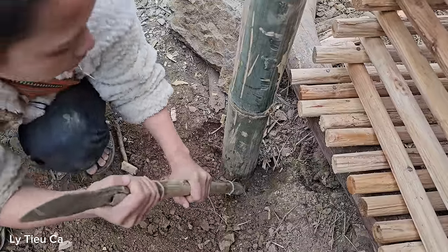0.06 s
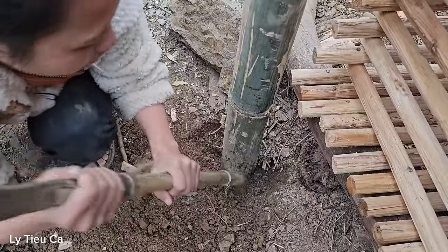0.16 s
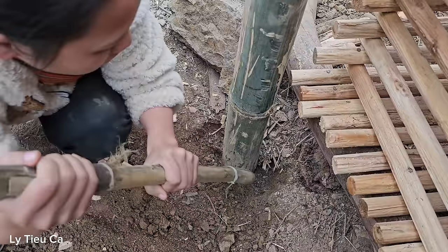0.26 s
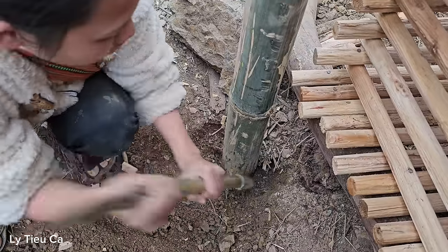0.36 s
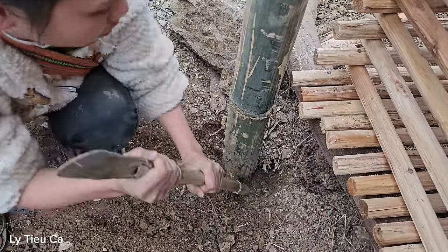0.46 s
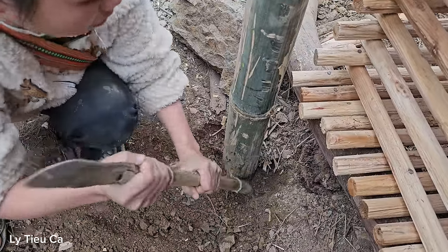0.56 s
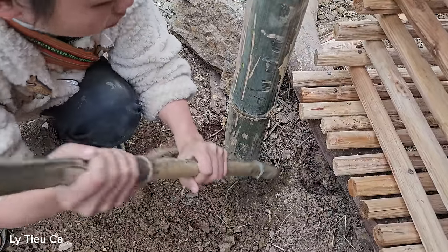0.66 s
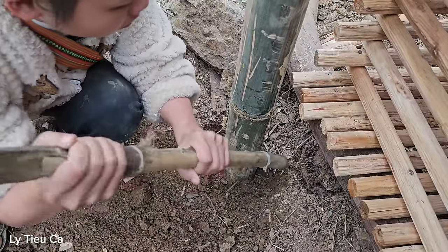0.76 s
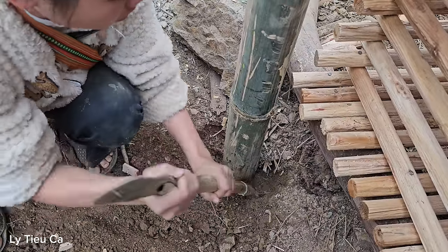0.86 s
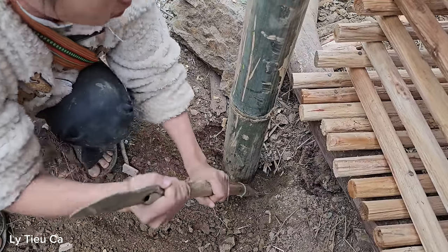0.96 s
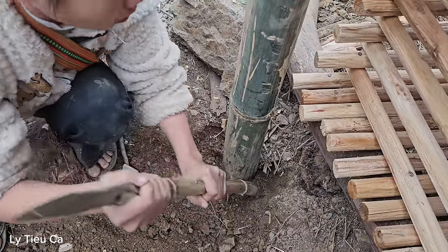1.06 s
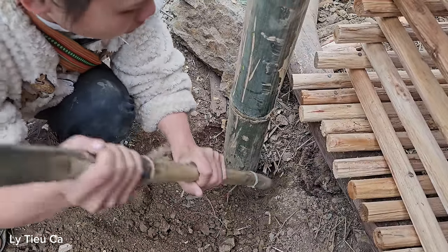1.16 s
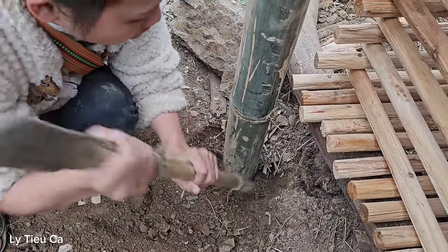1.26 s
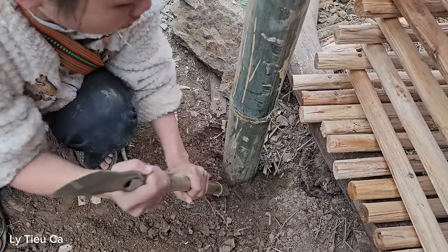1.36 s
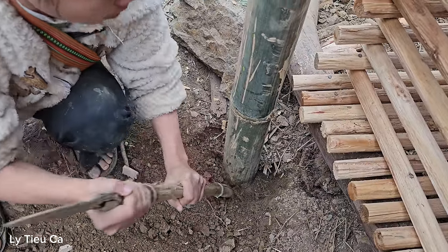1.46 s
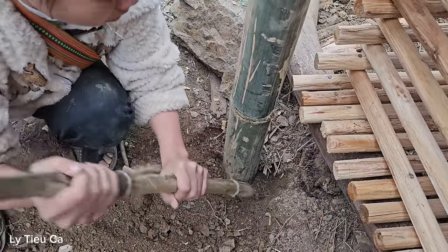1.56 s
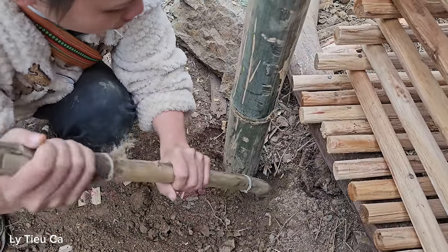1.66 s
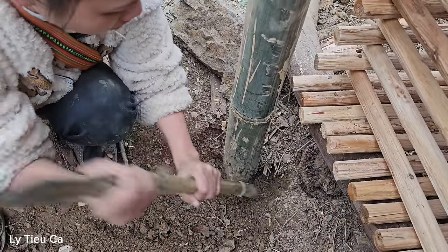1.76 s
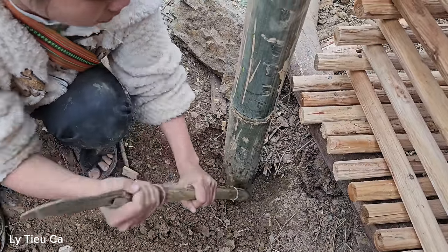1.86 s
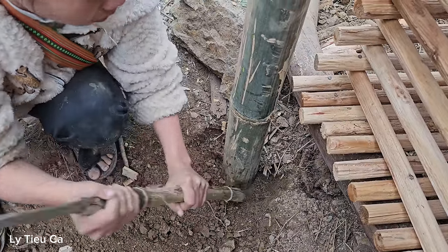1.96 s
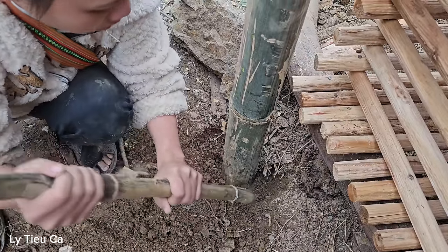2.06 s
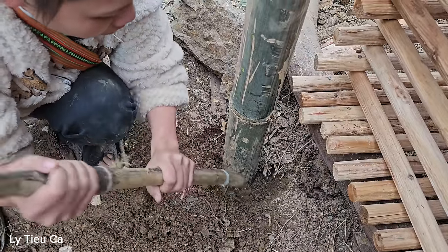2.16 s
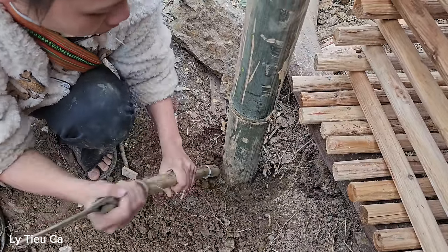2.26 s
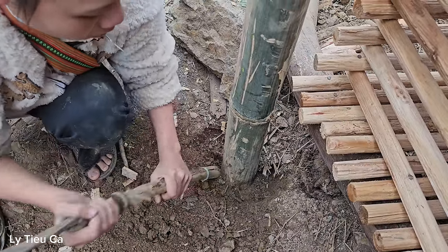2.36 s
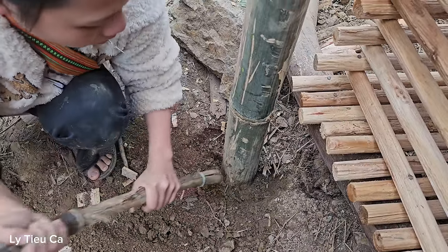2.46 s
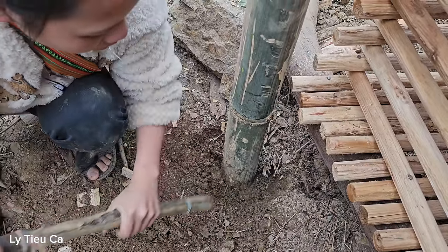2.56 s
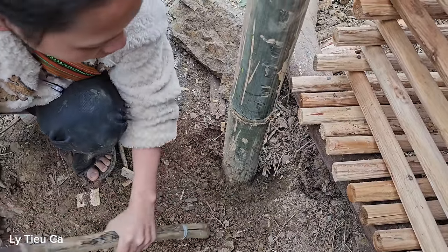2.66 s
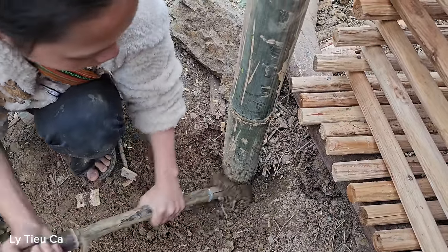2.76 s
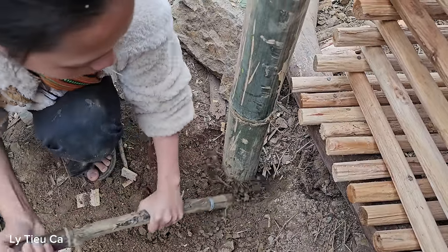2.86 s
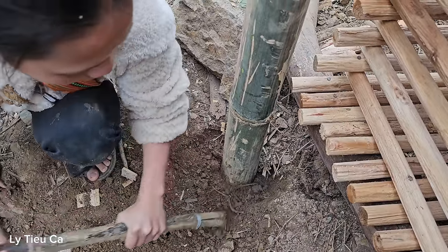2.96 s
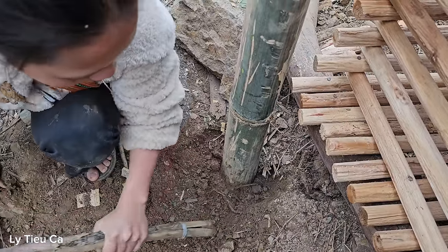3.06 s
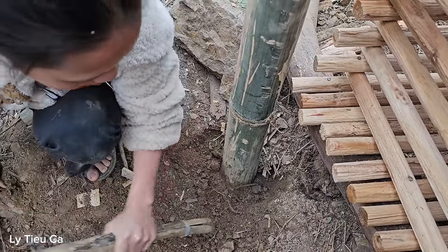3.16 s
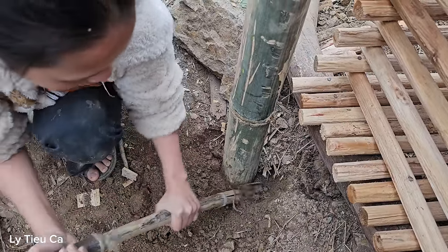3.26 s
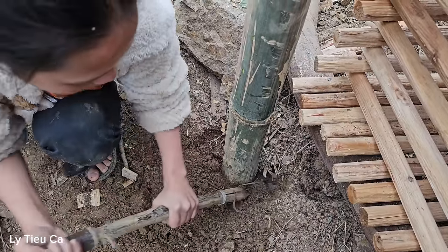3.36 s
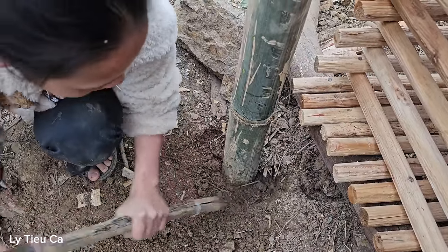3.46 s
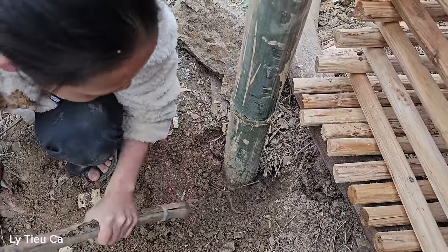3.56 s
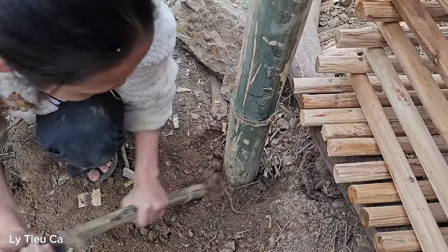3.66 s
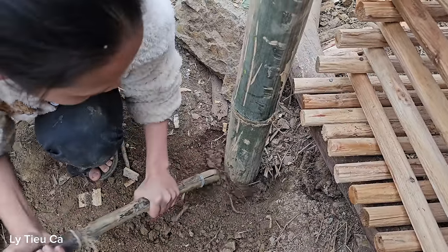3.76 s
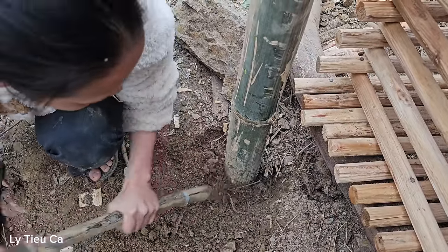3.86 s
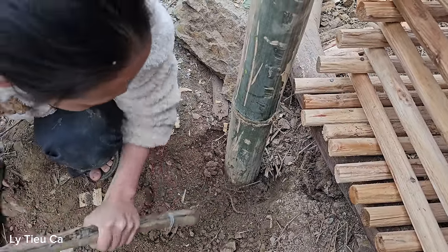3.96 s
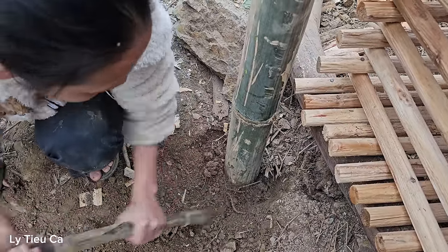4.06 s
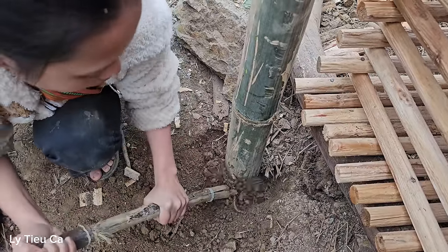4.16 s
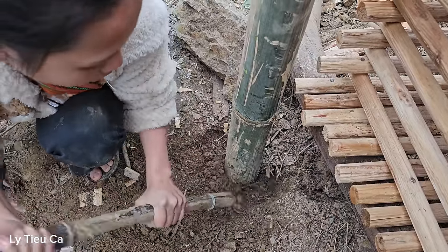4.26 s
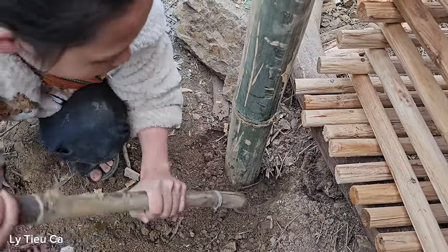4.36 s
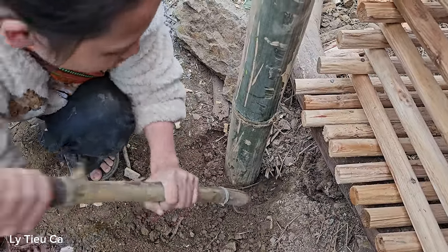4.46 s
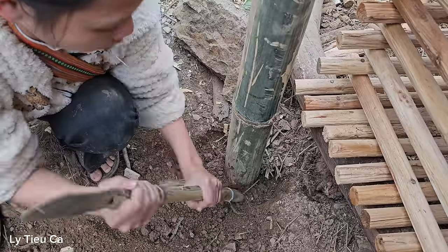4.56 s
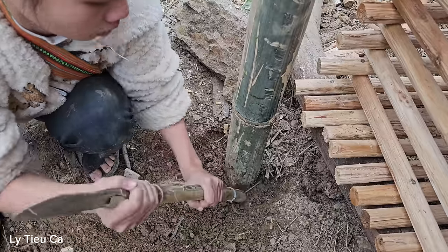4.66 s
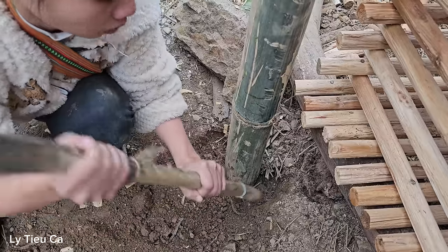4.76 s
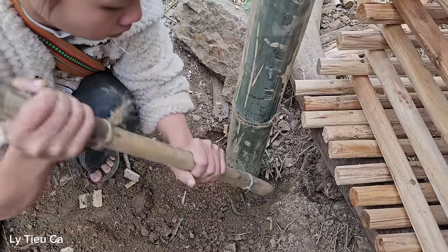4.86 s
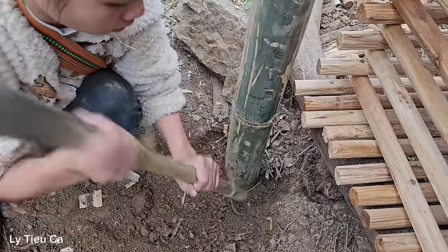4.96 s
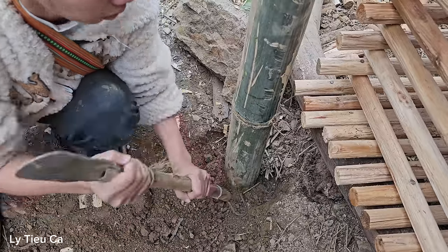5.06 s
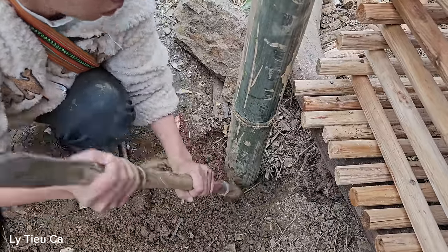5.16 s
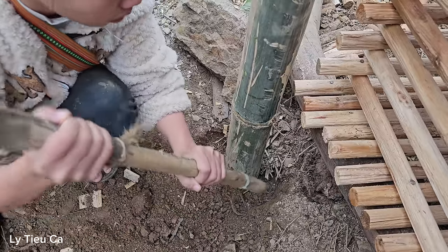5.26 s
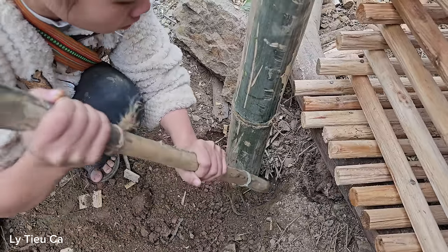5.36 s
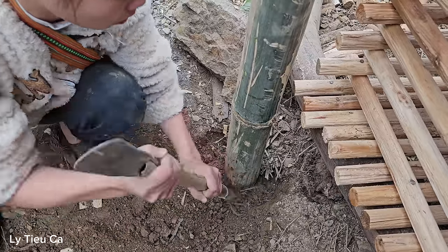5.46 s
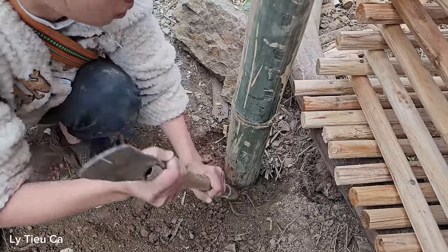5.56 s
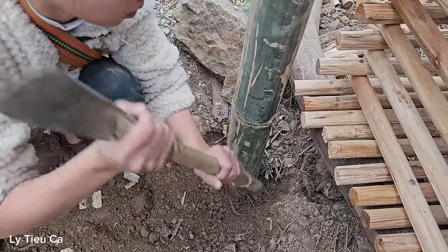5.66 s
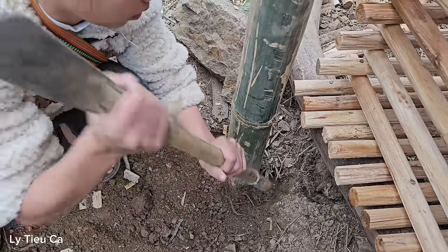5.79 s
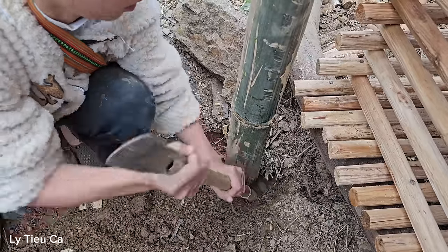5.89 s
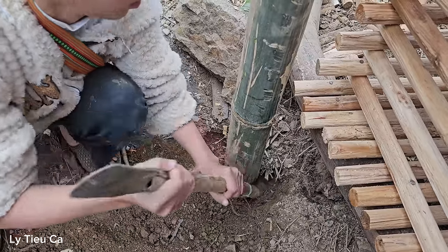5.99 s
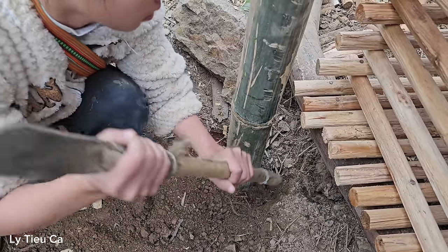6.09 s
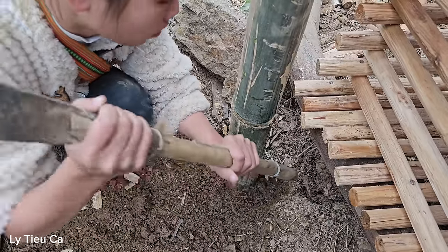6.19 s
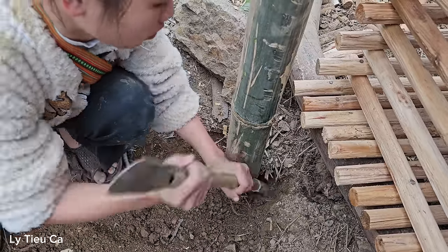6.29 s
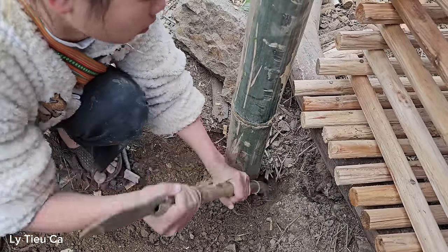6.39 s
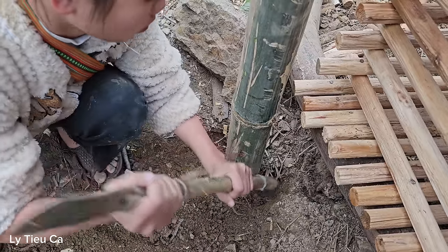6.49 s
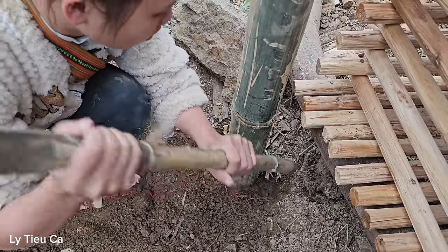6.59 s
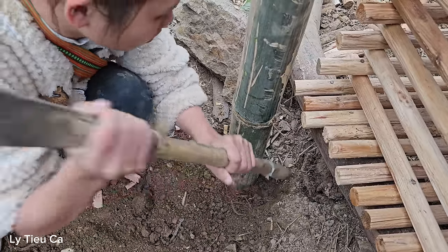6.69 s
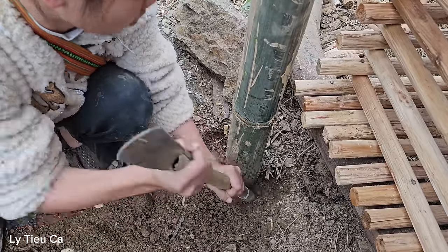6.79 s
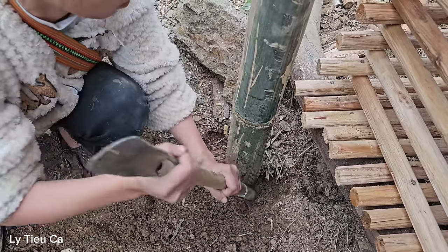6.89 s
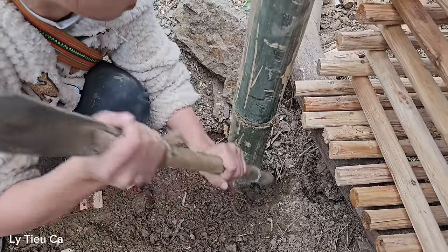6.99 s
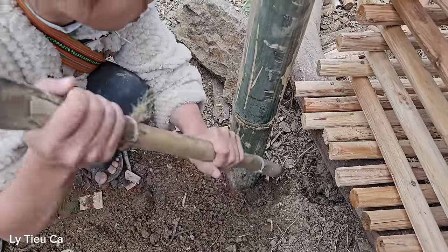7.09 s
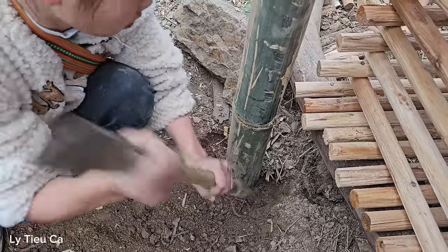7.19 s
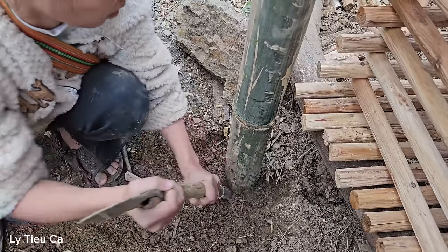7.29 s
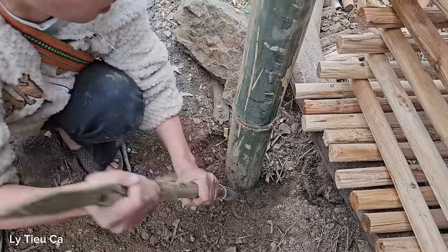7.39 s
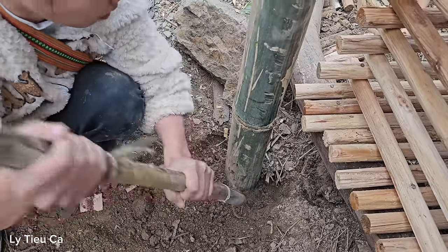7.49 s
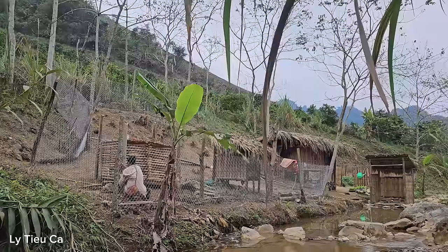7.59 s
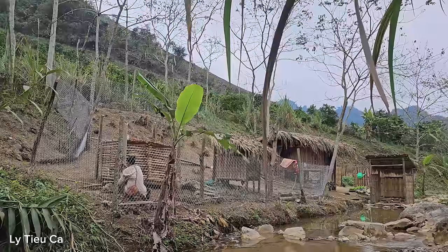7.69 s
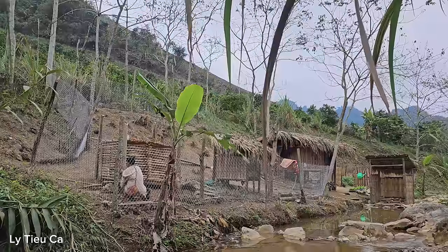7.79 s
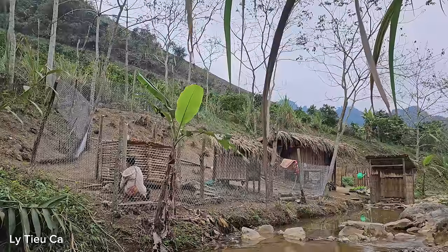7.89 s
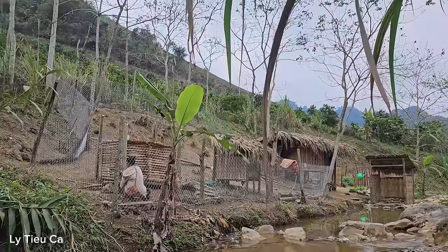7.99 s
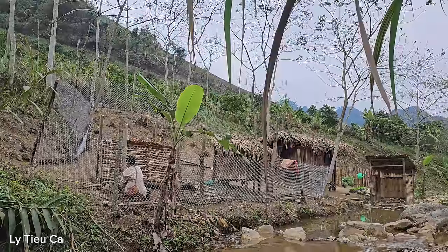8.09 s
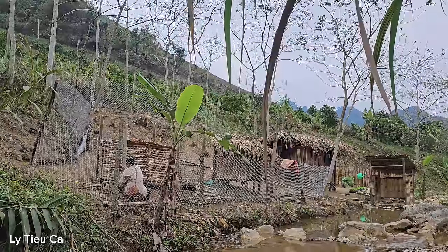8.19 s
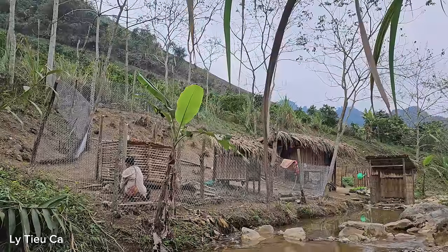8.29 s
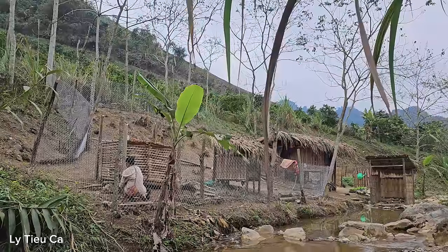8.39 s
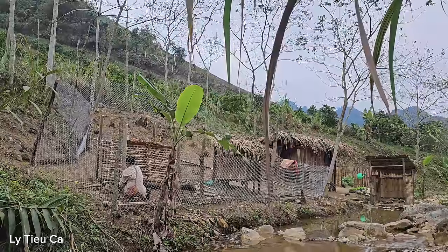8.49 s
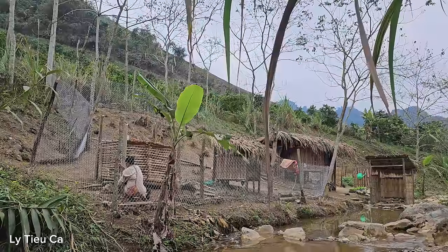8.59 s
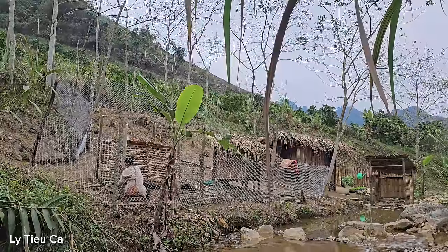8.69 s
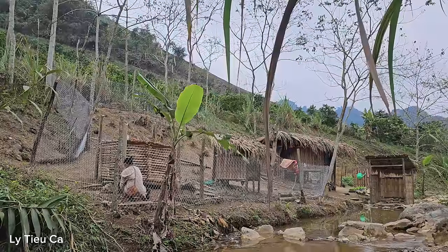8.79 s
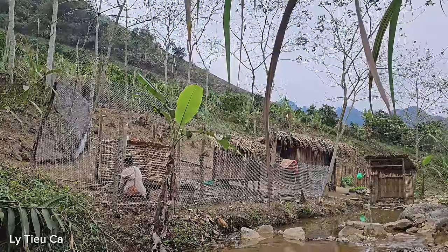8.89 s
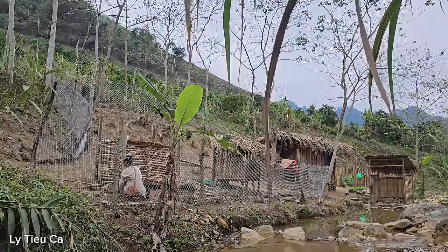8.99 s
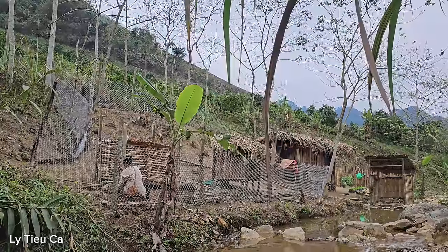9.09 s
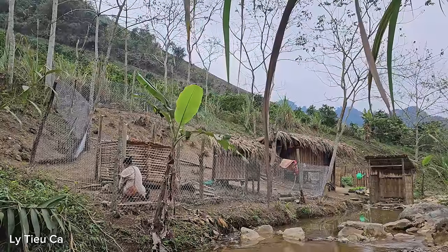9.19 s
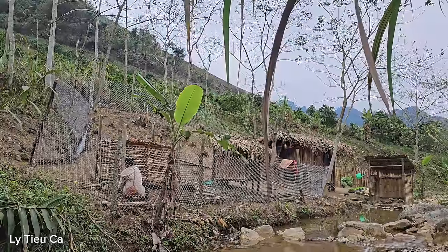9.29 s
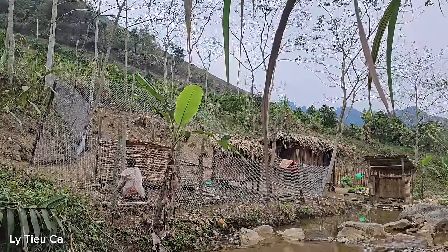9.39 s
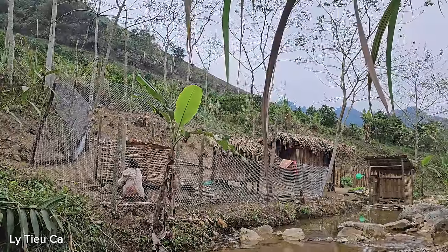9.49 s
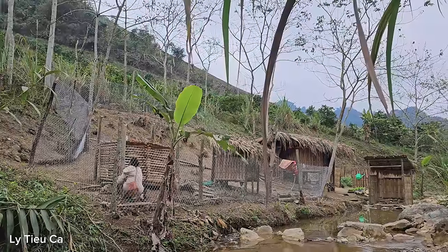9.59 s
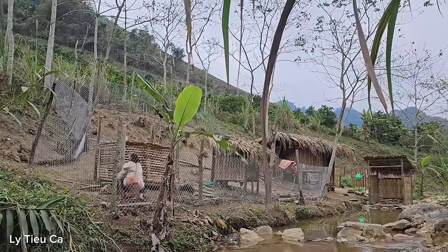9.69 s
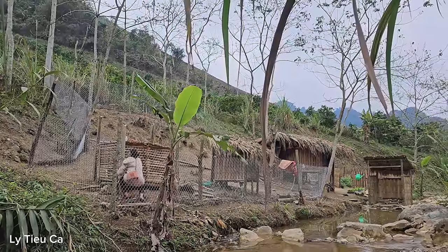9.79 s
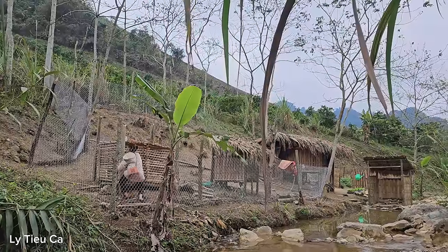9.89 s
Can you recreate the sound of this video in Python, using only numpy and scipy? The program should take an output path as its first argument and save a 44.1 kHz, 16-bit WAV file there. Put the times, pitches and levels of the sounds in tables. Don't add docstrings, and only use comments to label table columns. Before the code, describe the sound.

Sharp woody knocks, dull earth thuds and crunching grit repeat about twice a second among peeping chicks, then turn faint in a distant view.

```python
import sys
import numpy as np
from scipy import signal
from scipy.fft import rfft, irfft
from scipy.io import wavfile
from scipy.ndimage import uniform_filter1d

SR = 44100
rng = np.random.default_rng(int(sys.argv[2]) if len(sys.argv) > 2 else 0)


def ratio_of_db(decibels):
    return 10 ** (np.asarray(decibels, float) / 20)


def digitize_waveform(pressure):
    field = np.atleast_2d(pressure).T
    bounded = np.clip(field, -1, 1)
    quanta = np.round(bounded * 32767).astype(np.int16)
    wavfile.write(sys.argv[1], SR, quanta)


N = 438349
MOVE_S = 7.55
LEAD = 286
RIGHT_LAG_S = 21 / SR


def evened(x):
    return x / np.sqrt(np.mean(x ** 2) + 1e-20)


def read(points, hz):
    f, value = np.transpose(points)
    return np.interp(np.log(hz + 1), np.log(f + 1), value)


def coloured(x, points):
    hz = np.fft.rfftfreq(x.shape[-1], 1 / SR)
    return evened(irfft(rfft(x) * ratio_of_db(read(points, hz)), x.shape[-1]))


def ring(modes, seconds, detune=0.):
    t = np.arange(round(seconds * SR)) / SR
    return sum(ratio_of_db(db - 60 * t / t60) * np.sin(2 * np.pi * hz * (1 + detune * rng.standard_normal()) * t)
               for hz, db, t60 in modes)


def onset(sound, rise_s):
    return 1 - np.exp(-np.arange(len(sound)) / SR / rise_s)


def add(mix, s, sound):
    part = mix[:, round(s * SR):][:, :sound.shape[-1]]
    part += sound[..., :part.shape[1]]


def placed(events, source):
    out = np.zeros((2, N))
    for s, *settings in events:
        add(out, s, source(*settings))
    return out


def knock(db, crack_db, long_db, hollow_db, upper_db):
    # pitch_hz, level_db, t60_s
    handle = [(704.6, 0.5, 0.043), (790.9, -12.5, 0.04), (579, -8, 0.055), (755, 4.5, 0.007)]
    # pitch_hz, level_db, t60_s
    upper = [(1150, -9.5, 0.017)]
    # pitch_hz, level_db, t60_s
    side_ring = [(982, -7, 0.019), (1390, -19, 0.022)]
    # pitch_hz, level_db, t60_s
    fibres = [(1530, 21, 0.0057), (1790, 15, 0.011), (2215, 19, 0.015), (2770, 17.5, 0.012),
              (3123, 18, 0.0084), (3850, 16.5, 0.00904), (4500, 11.5, 0.0089), (5150, -16, 0.0038)]

    body = ring(handle, .2, detune=0.006)
    body += ratio_of_db(upper_db) * (ring(upper, .2, detune=0.01) - ring(side_ring, .2, detune=0.015))
    t = np.arange(len(body)) / SR
    grip_s = .055 + .01 * rng.random()
    body += ring([(506, long_db + 14.0, 0.086)], .2, detune=0.007) * np.exp(-(t / grip_s) ** 4)
    body += ring([(281, hollow_db + 15.5, 0.085)], .2, detune=0.012)
    body = signal.lfilter(*signal.butter(2, 690, "high", fs=SR), body)
    body *= onset(body, .00015)
    crack = ring(fibres, .2, detune=0.012)
    crack *= onset(crack, .00018)
    blow = body + ratio_of_db(crack_db - 19.0) * crack
    graze = ratio_of_db(-38) * body[:LEAD] * np.hanning(LEAD) ** .5 * np.exp(np.arange(LEAD) / 150)
    return -ratio_of_db(db) * (np.pad(blow, (LEAD, 0)) + np.pad(graze, (0, len(body))))


def post_knocks():
    # start_s, peak_db, crack_db, upper_db, hollow_db
    square = [(0.3511, -4, -11, 8, -11), (0.827, -4.5, -15, 4.5, -14), (1.761, -4, -10, 6.5, -15.5),
              (4.525, -23.5, 3.5, 10, -10), (4.53, -27.5, -3, 13, -14.5), (5.8261, -4.5, -5.5, 2, -18),
              (5.835, -37, -31, 2, -7), (6.2738, -12.5, -14.5, 2.5, -11), (6.7374, -5.5, -6.5, 6, -22),
              (7.1961, -13, -12.5, 5, -17), (7.2025, -15.5, -21, 3, -16)]
    # start_s, peak_db, crack_db, hollow_db, upper_db
    glancing = [
        (1.291, -46, -30, 20, -10),
        (2.1805, -19.5, -17, 1, -18),
        (2.7455, -27.5, -2, -1, -2),
        (3.2455, -32.5, -20, -7, 10),
        (3.672, -49.5, 23, 8, -1),
        (4.038, -58, 12, 6.5, 1),
        (4.969, -28.5, -6.5, -9, 2),
        (5.423, -34.5, -19, -21, -9),
        (8.769, -62, 2, -13, -3),
        (9.188, -53, -2, -3, 1),
    ]
    out = np.zeros((2, N))
    for s, db, crack_db, upper_db, hollow_db in square:
        add(out, s - LEAD / SR, knock(db, crack_db, -17.5, hollow_db, upper_db))
    for s, db, crack_db, hollow_db, upper_db in glancing:
        add(out, s - LEAD / SR, knock(db, crack_db, -8, hollow_db, upper_db))
    return out


def thud(db, slap_db, deep_db, post_db):
    # pitch_hz, level_db, t60_s
    ground = [(75.8, 1.3, 0.11), (92.5, 2.5, 0.047)]
    # pitch_hz, level_db, t60_s
    slap = [(200, 2.8, 0.042), (238, 8, 0.038)]
    # pitch_hz, level_db, t60_s
    deep = [(37.2, -5.5, 0.44)]
    # pitch_hz, level_db, t60_s
    post = [(108.5, -9, 0.22)]

    swing = ring(ground, .5, detune=0.017)
    swing += ratio_of_db(slap_db) * ring(slap, .5, detune=0.038)
    swing += ratio_of_db(deep_db) * ring(deep, .5)
    swing += ratio_of_db(post_db) * ring(post, .5, detune=0.036)
    swing *= onset(swing, 0.0041)
    swing = np.convolve(swing, np.hanning(round(0.0029 * SR)))
    return ratio_of_db(db + 4.0) * swing / abs(swing).max() * ratio_of_db([[.6], [-.6]])


def ground_thuds():
    # start_s, peak_db, slap_db, deep_db, post_db
    thuds = [(0.359, -16.5, 1.5, -7.5, 4.5), (0.834, -16.5, 2, -8, 2.5), (1.285, -20.5, -10, -5, 0.5),
             (1.769, -18.5, -6, -9, 6), (2.22, -23, -7.5, -9, 0), (2.752, -33.5, -2, -7, 20),
             (3.235, -48, 0, -10, 19), (3.619, -40, 1, 9.5, 10), (4.0415, -29, -2.5, -11, 3.5),
             (4.529, -24.5, -2.5, 0, -4), (4.97, -23, -5.5, -2.5, 4.5), (5.422, -18.5, -1, -3, 1),
             (5.836, -23, -4, -1.5, -4), (6.271, -28.5, -3, -1, 5), (6.743, -18.5, -1.5, -5.5, 1.5),
             (7.2015, -15.5, 4, -5.5, 2), (7.809, -42.5, -1, 1.5, 2), (8.291, -39, -1, -7.5, 3),
             (8.768, -36.5, -0.5, -6, -1), (9.19, -37.5, 3, -7, 2)]
    return placed(thuds, thud)


def crunch(db, low_db, seconds):
    # pitch_hz, level_db
    grit_low = [(300, -41), (900, -11.5), (2000, -15), (3200, -12.5), (4500, -9), (5800, -27.5),
                (8000, -80)]
    # pitch_hz, level_db
    grit_high = [(3000, -16), (5500, -9), (7500, -1.5), (9500, -10), (11500, -2), (13000, -9), (15800, -16),
                 (16800, -49.5)]
    # pitch_hz, level_db
    lumps = [(150, -51.5), (400, 7), (900, 1), (1500, -37.5), (2500, -57.5)]

    t = np.arange(8192) / SR
    seconds = np.clip(seconds, .003, .06)
    sink = np.clip(t / 0.0072, 0, 1) ** 2
    shape = sink * (np.exp(-(t / seconds) ** 2.57) + 0.1 * np.exp(-t / 0.03))
    grains = rng.standard_normal((3, len(t))) * ratio_of_db(1.3 * rng.exponential(1, len(t)))
    clumps = evened(uniform_filter1d(rng.standard_normal(len(t)), size=150))
    shape *= ratio_of_db(1.87 * clumps)
    grains = grains[:2] + .5 * grains[2]
    low = ratio_of_db(low_db - 1.0) * coloured(grains, grit_low) * ratio_of_db([[-1.2], [1.2]])
    high = coloured(grains, grit_high) * ratio_of_db([[-1.8], [1.8]])
    clod_db = -4.5 - .5 * (db + 39)
    clods = ratio_of_db(clod_db) * coloured(grains.sum(0), lumps)
    return ratio_of_db(db - 9.0) * shape * (low + high + clods)


def grit_crunches():
    # start_s, peak_db, low_db, length_s
    crunches = [(0.349, -32, 6, 0.021), (.47, -55, -12, 0.075), (0.825, -24.5, 7.5, 0.011),
                (1.2713, -34, 3, 0.028), (1.31, -45.5, 0, 0.026), (1.759, -30.5, 6, 0.015),
                (2.176, -29, 5.5, 0.011), (2.21, -38, 3.5, 0.031), (2.722, -38.5, 8, 0.046),
                (2.772, -28.5, 8, 0.012), (2.885, -47, -4, 0.018), (3.189, -47, 5.5, 0.066),
                (3.23, -36, 9, 0.034), (3.279, -40, 5.5, 0.018), (3.61, -36, -4, 0.021),
                (3.661, -38, 8.5, 0.036), (4.03, -43.5, 1, 0.0396), (4.091, -46.5, 8.5, 0.039),
                (4.5218, -20.5, 10, 0.0102), (4.962, -26, 2, 0.011), (5.416, -29.5, 3, 0.011),
                (5.826, -25.5, 6.5, 0.016), (5.857, -47, 10.5, 0.018), (5.931, -49, 8, 0.025),
                (6.258, -35.5, 10, 0.024), (6.309, -36, 4, 0.0083), (6.59, -52, 7, 0.016),
                (6.734, -24.5, 10.5, 0.0154), (7.196, -21.5, 2.5, 0.011), (8.283, -53, 11, 0.016),
                (8.756, -57.5, 9, 0.0413)]
    return placed(crunches, crunch)


def tick(db, hz, t60):
    return ring([(hz, db + 2.0, t60), (hz * 1.2, db - 9.5, t60), (hz * 0.77, db - 5.5, t60)], .03, detune=0.025)


def pebble_snaps():
    # start_s, peak_db, pitch_hz, t60_s
    ticks = [(1.301, -39.5, 3440, 0.0084), (1.318, -52.5, 13350, 0.035), (1.8, -54, 13350, .03),
             (1.326, -40, 3000, 0.0067), (2.216, -32, 4600, .01), (2.7346, -28, 3000, .006),
             (2.7424, -29, 3180, 0.0093), (2.7736, -20.5, 4300, 0.00495), (2.7788, -26.5, 2967, 0.016),
             (2.8724, -40, 4500, 0.0053), (2.8947, -39, 4800, .006), (3.192, -44, 4500, 0.007),
             (3.2863, -41.5, 3800, 0.0073), (3.328, -44, 3900, 0.0088), (4.0371, -44, 2980, 0.0057),
             (4.5265, -18.5, 900, 0.02), (4.53, -27, 925, 0.019), (5.285, -42.5, 5150, 0.0075),
             (5.8365, -26, 3950, .012), (5.864, -40, 4800, 0.0084), (6.264, -36, 7260, 0.028),
             (6.2735, -24.5, 4320, 0.018), (6.586, -43, 13500, 0.0065), (6.745, -27, 4115, 0.01),
             (8.291, -59, 3000, .008), (8.772, -41, 3500, 0.0091), (8.875, -47, 3700, .008),
             (9.11, -41, 3630, 0.0085)]
    return placed(ticks, tick)


def ports(x):
    # pitch_hz, left_lead_rad
    port_turn = [(800, -.1), (1000, -.45), (1150, 1.4), (1600, 1.3), (2100, -1), (2700, -.4), (3900, -.2),
                 (5500, 1)]
    # pitch_hz, left_minus_right_db
    port_lean = [(500, 1.4), (1000, 0.5), (1600, 6.5), (2700, 11.5), (3600, 1), (4600, -17), (6000, -5),
                 (9000, -7.5)]

    hz = np.fft.rfftfreq(N, 1 / SR)
    half = ratio_of_db(read(port_lean, hz) / 2) * np.exp(.5j * read(port_turn, hz))
    return irfft(rfft(x) * np.array([half, 1 / half]), N)


def peep(db, first_hz, last_hz, seconds, held):
    # pitch_hz, level_db
    beak = [(2300, -10), (3350, 6), (3980, 0), (4300, 0), (4680, -5), (5150, -2), (6600, 3), (7700, -8)]
    # pitch_hz, left_minus_right_db
    chick_lean = [(2500, 15), (3500, 12), (4500, -13), (5200, -14.5)]

    u = np.linspace(0, 1, round(seconds * SR))
    fall = np.hypot(u - held, .09) + u - held
    fall = (fall - fall[0]) / (fall[-1] - fall[0])
    beat = 2 * np.pi * (rng.uniform(18, 40) * u * seconds + rng.random())
    hz = first_hz + (last_hz - first_hz) * fall + 45 * np.cos(beat)
    hz += 2000 * seconds * np.maximum(held - u, 0) / 2
    turn = 2 * np.pi * np.cumsum(hz) / SR
    octave_db = -9 + .8 * (db + 50)
    tone = ratio_of_db(read(beak, hz)) * np.sin(turn)
    tone += ratio_of_db(read(beak, 2 * hz) + octave_db) * np.sin(2 * turn)

    hang_db = -4 * np.clip((held + .1 - u) / .2, 0, 1) * (held > 0)
    blur_db = 1.51 * evened(uniform_filter1d(rng.standard_normal(len(u)), size=400))
    flutter_db = 2.5 * np.sin(beat)
    tone *= ratio_of_db(db + 3.0 + flutter_db + hang_db + blur_db) * signal.windows.tukey(len(u), .3)
    lean, lag = read(chick_lean, hz) / 2, round(RIGHT_LAG_S * SR)
    return np.array([np.pad(tone * ratio_of_db(lean), (0, lag)), np.pad(tone * ratio_of_db(-lean), (lag, 0))])


def chicks():
    # start_s, level_db, top_hz, hold_s, fall_s
    small_peeps = [(1.1, -57, 5230, 0.022, 0.046), (1.415, -55.5, 4470, 0.028, 0.063),
                   (1.566, -51.5, 4150, 0.0483, 0.016), (2.022, -49, 4500, 0.032, 0.037),
                   (2.639, -51.5, 4374, 0.0246, 0.029), (3.025, -58.5, 4020, 0.009, 0.021),
                   (4.13, -51, 4600, 0.014, 0.046), (5.56, -56, 4200, 0.062, 0.023),
                   (5.639, -62, 4337, 0.0117, 0.072), (5.853, -59, 4390, 0.013, 0.065),
                   (6.51, -57.5, 4580, 0.058, 0.068), (6.872, -52, 2460, 0.031, 0.012),
                   (8.474, -60.5, 4190, 0.1037, 0.04), (9.786, -64, 4363, 0.061, 0.052)]
    # start_s, level_db, last_hz, hold_s, fall_s
    big_peeps = [
        (0.21, -59.5, 3600, 0.09, 0.076),
        (6.429, -58.5, 4600, 0.039, 0.081),
        (5.972, -53.5, 1950, 0.091, 0.094),
    ]
    # start_s, level_db, hold_s, fall_s
    far_peeps = [
        (7.865, -63, 0.012, 0.05),
        (7.964, -67, 0.051, .07),
        (8.047, -66.5, 0.035, 0.047),
        (8.785, -59, 0.057, 0.08),
    ]
    # start_s, level_db, first_hz, last_hz, length_s
    scraps = [(0.061, -59, 4750, 4070, 0.078), (.4, -59, 4340, 4300, .025),
              (0.464, -54.5, 3850, 2760, 0.0587), (0.541, -59, 4550, 3700, 0.041),
              (0.655, -51.5, 4056, 2910, 0.041), (0.741, -59.5, 5280, 5160, 0.039),
              (0.771, -53.5, 5090, 4970, 0.068), (0.865, -47.5, 4270, 2870, 0.062),
              (0.954, -59, 4600, 4300, 0.062), (.96, -61, 4100, 4300, 0.069),
              (1.053, -58.5, 4880, 5250, 0.054), (1.5, -62, 4820, 4300, 0.052),
              (1.972, -63, 4750, 4550, 0.047), (2.018, -60, 3450, 2950, .024),
              (2.146, -55.5, 4443, 4300, 0.02), (2.195, -57, 3720, 3230, 0.026),
              (2.676, -58, 4480, 4200, 0.054), (2.896, -55, 4250, 4050, 0.061),
              (2.953, -57.5, 3260, 2850, 0.029), (3.097, -55, 4150, 3820, 0.052),
              (3.383, -59, 4300, 3580, 0.042), (3.429, -55.5, 3400, 2800, 0.043),
              (3.587, -55, 4500, 4340, 0.056), (3.637, -54, 3465, 3080, 0.0297),
              (3.762, -58, 4130, 2980, 0.04), (4.469, -56, 5240, 5280, 0.07),
              (4.611, -47.5, 4580, 2330, 0.0695), (4.842, -58.5, 4460, 4230, 0.072),
              (5.015, -58.5, 5440, 4950, 0.13), (5.012, -55.5, 5050, 4800, 0.107),
              (5.056, -57.5, 4350, 4200, 0.027), (5.102, -59.5, 3670, 2800, 0.032),
              (5.148, -53, 4300, 2310, 0.075), (6.785, -60, 3170, 2600, 0.032),
              (6.86, -59, 4950, 5110, .085), (6.949, -51, 4450, 2450, 0.064),
              (7.303, -63, 5030, 4620, 0.135), (7.417, -63.5, 3920, 3330, 0.033),
              (7.432, -54, 4370, 2230, 0.073)]
    # start_s, level_db, first_hz, last_hz, length_s
    far_scraps = [(7.626, -62, 4380, 3700, .05), (7.675, -58.5, 4300, 2885, 0.037),
                  (7.696, -60, 4200, 3950, 0.046), (7.781, -63, 3140, 2700, .03),
                  (8.44, -64, 4900, 4850, .07), (8.728, -57, 4940, 5050, 0.068),
                  (8.788, -65, 4940, 4680, .04), (8.92, -59.5, 4300, 3750, 0.096),
                  (9.061, -61, 4350, 4034, 0.087), (9.148, -58, 3990, 4150, 0.047),
                  (9.203, -61, 4220, 3920, 0.034), (9.6, -66, 4330, 3520, 0.11),
                  (9.776, -68, 5260, 5100, .04), (9.862, -62, 4200, 3900, 0.044)]

    calls = []
    for s, db, top_hz, hold, fall in small_peeps:
        low_hz = 2560 - 32.5 * (db + 54.5)
        calls.append((s, db, top_hz, low_hz, hold, fall))
    calls += [(s, db, 5050, last_hz, hold, fall) for s, db, last_hz, hold, fall in big_peeps]
    calls += [(s, db, 4300, 3570, hold, fall) for s, db, hold, fall in far_peeps]
    calls += [(s, db, first_hz, last_hz, 0, fall) for s, db, first_hz, last_hz, fall in scraps + far_scraps]
    out = np.zeros((2, N))
    for s, db, first_hz, last_hz, hold, fall in calls:
        add(out, s, peep(db, first_hz, last_hz, hold + fall, hold / (hold + fall)))
    return out


def yard(x):
    length = SR // 4
    taps = np.zeros((2, length))
    slots = np.arange(100, length - 22, 22)
    at = slots + rng.integers(0, 22, (2, len(slots)))
    np.put_along_axis(taps, at, rng.choice([-1., 1.], at.shape), 1)
    taps *= ratio_of_db(-60 * np.arange(length) / SR / 0.16)
    return signal.fftconvolve(x, taps / np.linalg.norm(taps[0]), axes=1)[:, :N]


def engine():
    # start_s, firing_hz, level_db
    running = [(0, 21.5, -60), (.6, 23, -56), (1.6, 23.3, -56), (1.95, 20, -56), (2.2, 19.8, -53),
               (2.5, 20.7, -53), (3.0, 21.7, -53), (3.5, 23, -54), (4.0, 23.7, -53), (4.7, 24.5, -52),
               (5.0, 24.3, -53), (5.3, 23, -55), (5.8, 22, -58), (6.5, 21.5, -59), (7.0, 20.8, -57),
               (7.55, 20.3, -58)]
    # multiple, level_db
    orders = [(2, -10), (3, -13), (4, -2), (5, -2), (6, -10), (7, -15)]

    s, hz, db = np.transpose(running)
    t = np.arange(N) / SR
    turn = 2 * np.pi * np.cumsum(np.interp(t, s, hz)) / SR
    hum = np.zeros(N)
    for multiple, level_db in orders:
        waver = rng.standard_normal(61)
        waver_db = 2.7 * np.interp(t, np.linspace(0, t[-1], 61), waver)
        hum += ratio_of_db(level_db - 1.5 + waver_db) * np.sin(multiple * turn + 9 * waver[0])
    return hum * ratio_of_db(np.interp(t, s, db)) * np.clip((MOVE_S - t) / 0.0102, 0, 1)


def bloop(db, hz, t60):
    tone = ring([(hz, db, t60)], .3)
    return tone * np.clip(np.arange(len(tone)) / SR / 0.004, 0, 1)


def stream_bubbles():
    # start_s, peak_db, pitch_hz, t60_s
    bubbles = [(0.537, -36.5, 240, 0.11), (.533, -43, 634, 0.073), (8.25, -43, 940, 0.061),
               (8.275, -37, 238, 0.08), (8.42, -47.5, 200, 0.37), (8.543, -40, 189, 0.23),
               (8.59, -38, 755, 0.044), (8.871, -42, 181.2, 0.16), (9.151, -38, 200, 0.099),
               (9.36, -49, 193, 0.56), (7.871, -36.5, 209, 0.047), (1.058, -41, 874, 0.035),
               (1.494, -40.5, 790, .05), (2.708, -43, 720, 0.083), (4.357, -42.5, 796, 0.084),
               (4.555, -44, 1990, .04), (5.523, -36.5, 910, 0.0258)]
    return placed(bubbles, bloop)


def air():
    # pitch_hz, level_db_per_hz
    near_air = [(15, -51), (25, 3.5), (97, -4), (149, -14), (190, 2.5), (277, -10), (416, -6), (659, -13.5),
                (754, -6), (1070, -12), (2160, -12), (2480, -15.5), (3160, -11.5), (4140, -16.5),
                (16000, -33)]
    # pitch_hz, width_hz, level_db
    near_peaks = [(11540, 330, 8.5), (7180, 1300, 4), (4750, 590, 7.5), (2043, 83, 2)]
    # pitch_hz, level_db_per_hz
    far_air = [(15, -57), (25, -27), (43, -12), (130, -22), (185, -6.5), (277, -23.5), (545, -13.5),
               (796, -15.5), (962, -20.5), (2280, -21.5), (3160, -23), (4140, -22.5), (4870, -28.5),
               (8360, -34), (16000, -43.5)]
    # pitch_hz, likeness
    likeness = [(60, 0.93), (300, 1), (1000, 0.09), (2000, 0.75), (4500, 0.13), (8000, 0.03),
                (16000, 0.041)]
    # pitch_hz, left_minus_right_db
    hiss_lean = [(60, .5), (600, 0), (1400, -4), (3100, 1), (6800, -6.5), (15000, 3)]

    frames, hz = N // 512 + 5, np.fft.rfftfreq(2048, 1 / SR)
    a, b, c, d, patches = rng.standard_normal((frames, 1025, 5)).T
    patches = evened(uniform_filter1d(uniform_filter1d(patches, 12, 0), 5, 1))
    patch_db = 3.68 * patches / (1 + hz / 6000)[:, None]

    t = np.arange(frames) * 512 / SR
    peaks_db = sum(db * np.exp(-((hz - f) / width) ** 2) for f, width, db in near_peaks)
    near_db = -51.5 + 20 * np.log10(evened(ratio_of_db(read(near_air, hz) + peaks_db)))
    far_db = -52.5 + 20 * np.log10(evened(ratio_of_db(read(far_air, hz))))
    level_db = np.where(t < MOVE_S, near_db[:, None], far_db[:, None])
    level_db = level_db - 60 * (hz > 15850)[:, None]

    same = np.clip(read(likeness, hz), 0, 1)[:, None]
    left = a + 1j * b
    right = same * left + np.sqrt(1 - same ** 2) * (c + 1j * d)
    right = right * np.exp(-2j * np.pi * hz * RIGHT_LAG_S)[:, None]
    lean = read(hiss_lean, hz)[:, None] / 2
    z = np.array([left * ratio_of_db(lean), right * ratio_of_db(-lean)]) * ratio_of_db(level_db + patch_db - 27.0)
    return signal.istft(z, nperseg=2048, noverlap=1536)[1][:, :N]


def scene():
    tamping = ports(post_knocks() + pebble_snaps()) + grit_crunches()
    flock = chicks()
    echoes = yard(ratio_of_db(-23.0) * tamping + .35 * flock)
    return tamping + ground_thuds() + flock + echoes + engine() + stream_bubbles() + air()


def top_cut(x):
    return signal.sosfilt(signal.butter(12, 15900, fs=SR, output="sos"), x)


def record(dry):
    thin = signal.lfilter(*signal.butter(2, 47.5, "high", fs=SR), dry)
    limited = np.clip(np.tanh(thin * 0.27) / 0.33, -.96, .96)
    return top_cut(limited)


dry = scene()
out = record(dry)
digitize_waveform(out)
```